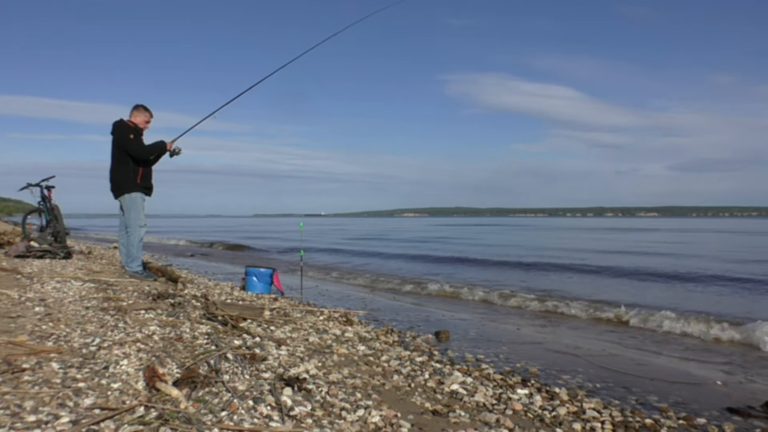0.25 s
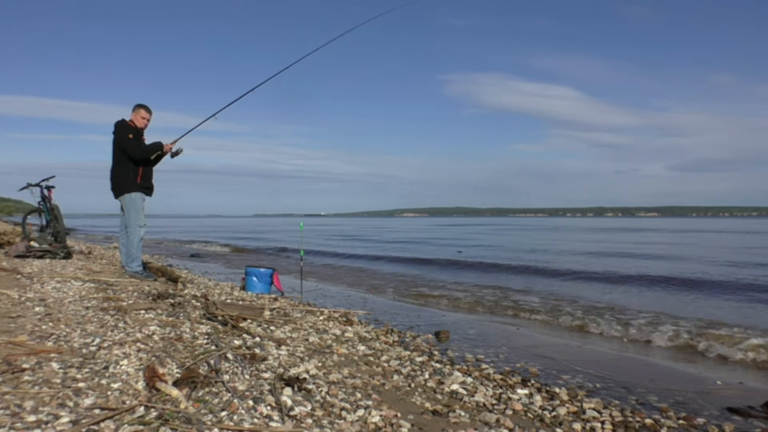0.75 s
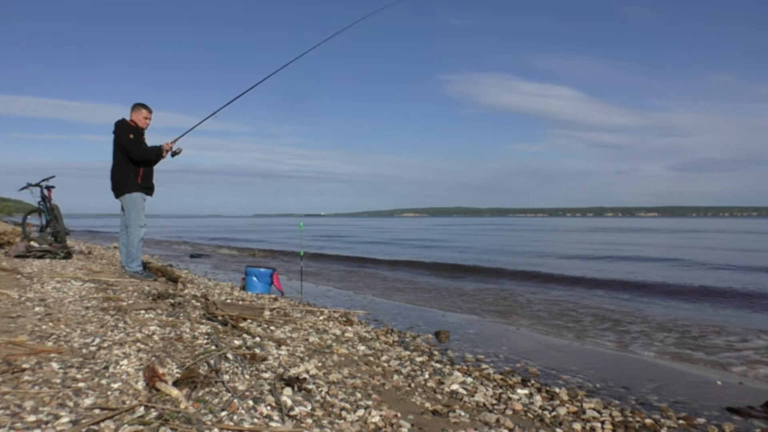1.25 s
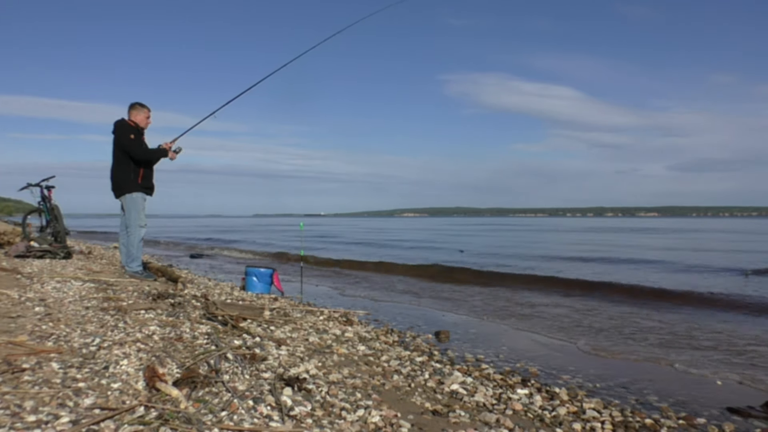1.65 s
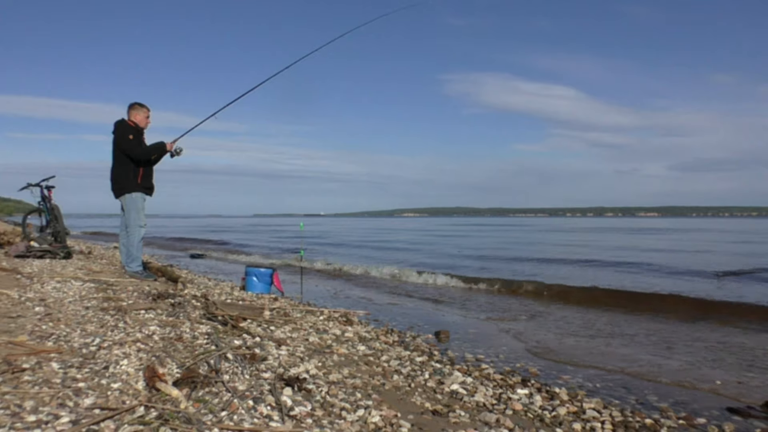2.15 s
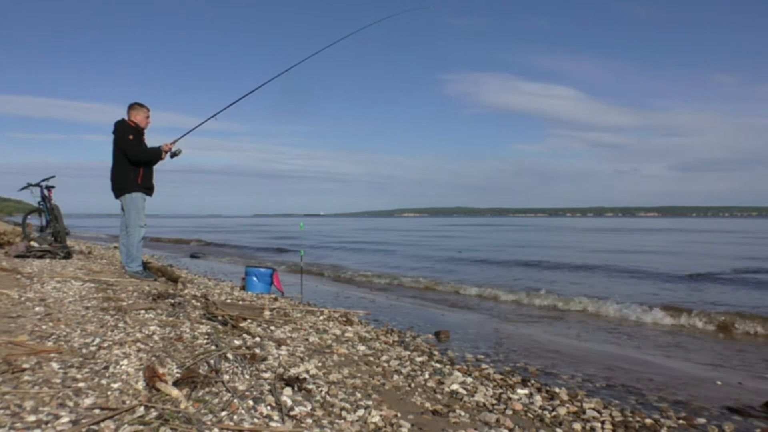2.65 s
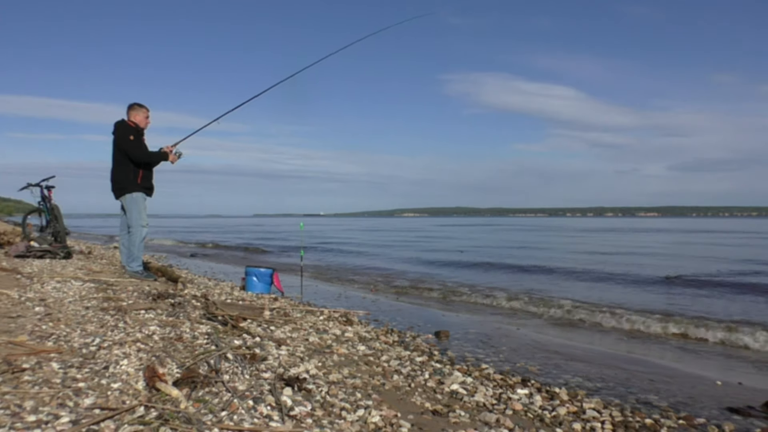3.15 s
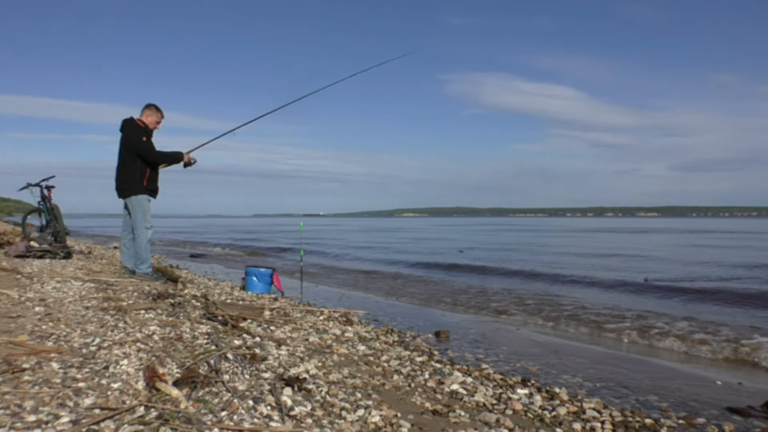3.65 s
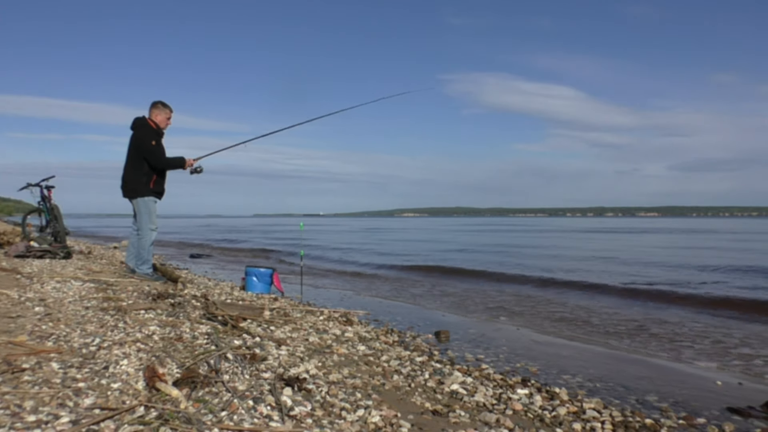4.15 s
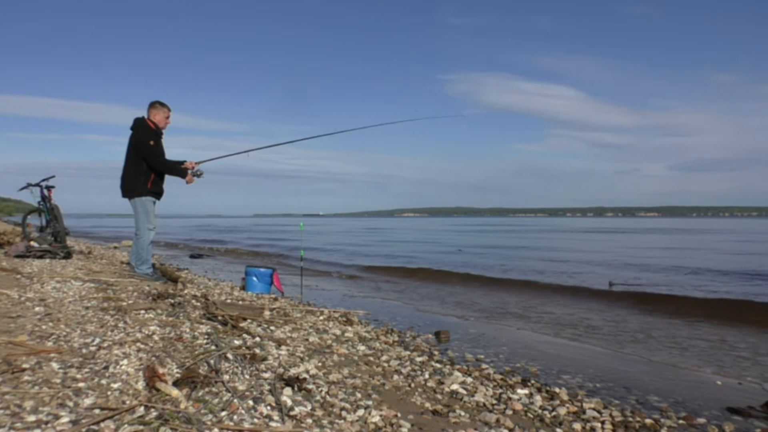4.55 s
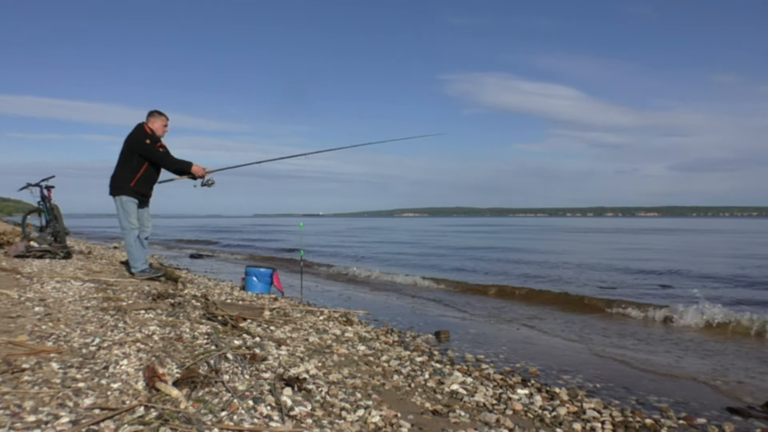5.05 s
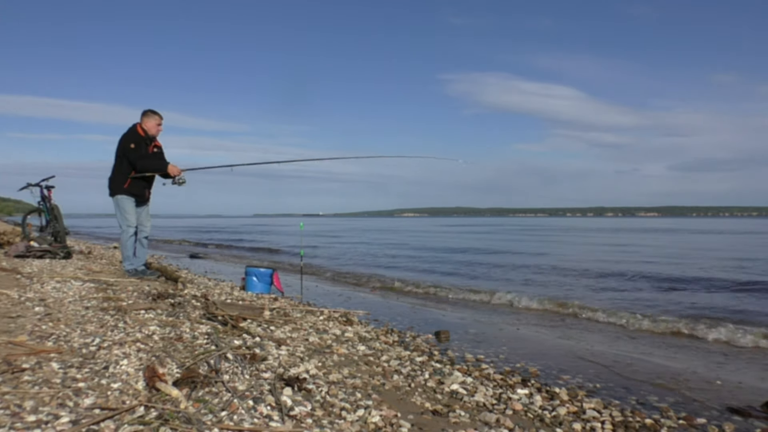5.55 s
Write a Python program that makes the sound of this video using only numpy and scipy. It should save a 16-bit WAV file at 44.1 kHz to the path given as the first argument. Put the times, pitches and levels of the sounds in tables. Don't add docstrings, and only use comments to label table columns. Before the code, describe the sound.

Close stereo wash of little waves on shingle: constant watery hiss, plopping bubbles, tiny pebble ticks and a quieter lull before the last break.

```python
import sys
import numpy as np
from scipy import signal
from scipy.io import wavfile

SR = 44100
rng = np.random.default_rng(int(sys.argv[2]) if len(sys.argv) > 2 else 0)


def store_wav(level_fs):
    pcm = np.round(np.clip(np.atleast_2d(level_fs), -1, 1) * 32767)
    wavfile.write(sys.argv[1], SR, pcm.T.astype(np.int16))


def natural_amplitude(level_db):
    exponent = np.asarray(level_db, float) / 20
    return 10 ** exponent


N = 255325

# (f/Hz, left port's lag/rad for a source on the right, left minus right/dB, scattered share 0-1)
PORTS = [(100, .01, 0, .0002), (450, .07, 0, .004), (1000, .27, -.3, .012), (2000, .4, -1.6, .025),
         (3000, .55, 0, .035), (4100, .85, .3, .06), (5200, 1.15, 2.2, .07), (6200, 1.8, 3, .08),
         (7200, 2.35, 1.5, .08), (8300, 2.7, -2.2, .08), (10500, 2.9, -3.5, .1), (15000, 3.0, -1, .1)]
# (t/s, level of the close one on the right over the far one ahead/dB)
RIGHT = [(0.0, -1), (0.45, 4.5), (0.75, 8), (1.0, 17), (1.7, 20.5), (1.9, 2.5), (2.2, -2.5), (2.62, -4),
         (2.74, 3.5), (3.2, 8), (3.62, 10), (3.72, 19.5), (4.65, 15.5), (4.8, 3.5), (5.0, -0.5), (5.3, 0),
         (5.79, 2.5)]
# (f/Hz, close stretch against the far one/dB, lift of the close one/dB)
HOUSING = [(1000, -5.5, 0), (4000, -4.5, 0), (5300, 2.5, 0), (7500, 0, 2.5), (9080, -1.5, 2),
           (10500, -2.5, 0), (12000, -3, 0), (14500, -0.5, 0)]


def in_time(rows):
    s, *columns = np.transpose(rows)
    return [np.interp(np.arange(N) / SR, s, c) for c in columns]


def at_hz(points, hz):
    f, *columns = np.transpose(points)
    return [np.interp(np.log(hz), np.log(f), c) for c in columns]


def drift(rate):
    every = 40
    r = np.exp(-80 * np.pi * rate / SR)
    noise = rng.standard_normal(N // every + 2002)
    slow = signal.lfilter([1], [1, -2 * r, r * r], noise)[2000:]
    return np.interp(np.arange(N) / every, np.arange(len(slow)), slow / slow.std())


def swells(events, width_s):
    t = np.arange(0, N / SR + .002, .001)
    lift_db = sum(db * np.exp(-.5 * ((t - s) / width_s) ** 2) for s, db in events)
    return np.interp(np.arange(N) / SR, t, lift_db)


def ports(wave, hz, bearing):
    lag, lean_db, _ = at_hz(PORTS, hz)
    half = np.exp(.5j * lag * bearing) * natural_amplitude(-.5 * lean_db * bearing)
    return np.array([(wave / half).real, (wave * half).real])


def right_share(right_db, hz):
    return 1 / (1 + natural_amplitude(-2 * (right_db + at_hz(HOUSING, hz)[0])))


def beach(near, around, hz, right_db):
    share = right_share(right_db, hz)
    scattered = min(0.82 * at_hz(PORTS, hz)[2], 1)
    far, other = np.roll(near, N // 3), np.roll(around, N // 2)
    close_part = np.sqrt(share) * natural_amplitude(at_hz(HOUSING, hz)[1]) * ports(near, hz, bearing=1)
    far_part = np.sqrt(1 - share) * ports(far, hz, bearing=0.1)
    scatter_part = np.array([around.real, other.real])
    return np.sqrt(1 - scattered) * (close_part + far_part) + np.sqrt(scattered) * scatter_part


def ring(kicks, hz, cycles):
    pole = np.exp((2j * np.pi - np.log(1000) / cycles) * hz / SR)
    out = signal.lfilter([1], np.poly([pole] * 3), kicks + 1e-18)
    return out / np.sqrt(np.mean(out.real ** 2, axis=-1, keepdims=True))


def collapses():
    # (t/s, lift/dB)
    crests = [
        (0.875, 1),
        (1.002, 2.5),
        (2.74, -0.5),
        (3.385, 3),
        (4.78, -0.5),
        (4.895, 6.5),
    ]
    t = np.arange(N) / SR
    fade_s = 0.063
    return sum(db * (t > s) * np.exp(-np.maximum(t - s, 0) / fade_s) for s, db in crests)


def clumps(hz):
    # (t/s, lift/dB, centre f/Hz)
    groups = [(0.125, 5.5, 664), (0.244, 4, 660), (0.454, 3.5, 380), (0.459, 5, 865), (0.579, 5, 663),
              (0.733, 0.5, 430), (0.828, 7, 2590), (0.968, 12.5, 381), (1.073, 6, 3350), (1.397, 2, 660),
              (1.437, 2, 295), (1.541, 4.5, 3960), (1.541, 5.5, 650), (2.01, 6.5, 1140), (2.08, 4.5, 660),
              (2.215, 5.5, 870), (2.23, 7, 430), (2.434, 4, 1000), (2.779, 6, 1500), (2.893, 3.5, 2620),
              (2.978, 5, 570), (3.053, 3, 380), (3.133, 1, 2620), (3.317, 2, 380), (3.412, 4, 1140),
              (3.417, 7, 2280), (3.542, 3.5, 574), (3.692, 6, 495), (3.712, 2, 2940), (3.811, 3, 2900),
              (3.921, 6, 651), (4.046, 0, 500), (4.32, 1, 380), (4.505, 4.5, 503.5), (4.644, 5.5, 497),
              (4.899, 5, 325), (5.128, 6, 380), (5.193, 5, 500), (5.208, 3.5, 3960), (5.373, 5, 380),
              (5.607, 10, 380), (3.02, 3.5, 2980), (3.08, 3, 2780), (3.17, 1.5, 2600), (3.31, 1, 2500),
              (3.36, 4, 2900), (3.45, 0, 2900), (1.49, 4, 1000), (0.73, -1, 800), (0.3, 1, 2800),
              (0.7, 3.5, 2600), (5.4, -3.5, 1100), (5.48, -3, 1050), (5.55, -4, 1150), (1.3, 4, 560),
              (3.5, -4, 4300), (1.63, -1, 400), (1.74, 0, 800)]
    octaves = 0.17
    lifts = []
    for s, db, centre_hz in groups:
        distance = np.log2(hz / centre_hz) / octaves
        lifts.append((s, db * np.exp(-.5 * distance ** 2)))
    return swells(lifts, width_s=0.028)


def foam(cycles, births_per_cycle, size_db, hiss_db, patchy_db, surge_db):
    # (t/s, wash level/dB, big bubbles over the wash/dB, spray over the wash/dB)
    surf = [(0.0, -25.5, -0.5, 1), (0.78, -25, 1, 2.5), (1.05, -23, -0.5, 2), (1.47, -23.5, 0.5, -2),
            (1.66, -30, 1, 2), (1.88, -31.5, -2.5, 1.5), (2.15, -29.5, 2.5, 2), (2.62, -27, -1, 0),
            (2.72, -26.5, -0.5, 5), (3.1, -23, -0.5, -2), (3.58, -24.5, -1, 2), (3.8, -22.5, -0.5, -1.5),
            (4.3, -32.5, -2.5, 1), (4.76, -39, -2.5, 3), (4.92, -33, -3.5, 3.5), (5.27, -26, -1.5, 1),
            (5.66, -28, -6, -1), (5.79, -29.5, -8.5, 0.5)]
    # (f/Hz, level/dB per Hz)
    colour_curve = [(60, -34.5), (90, -52), (130, -21.5), (200, -14.5), (300, -7), (480, -0.5), (650, -1.5),
                    (950, -3.5), (1500, -4.5), (2300, -6), (3200, -7), (4500, -11), (6000, -18),
                    (8000, -24), (10500, -28), (12500, -32.5), (14500, -56)]
    size_hz = [450, 1600, 3800, 8500]
    # (t/s, lift of the small
    # bubbles/dB)
    splashes = [(0.262, 1.5), (0.437, 1), (0.524, 2.5), (0.885, 2.5), (1.042, 0), (1.111, 0.5), (1.383, 0),
                (2.148, 1.5), (2.744, 4), (3.073, 2), (3.133, -1), (3.358, 2), (3.395, 0), (3.412, 1),
                (3.432, 3.5), (3.452, 2), (4.276, 3), (4.517, 3.5), (4.795, 3.5), (4.84, 3), (4.925, 3.5),
                (4.95, 4), (5.277, 1), (5.5, 3.5)]
    # (t/s, lift/dB)
    tumbles = [(0.24, 0.5), (0.5, -1), (0.66, 1), (0.76, 0), (0.88, -0.5), (1.05, -0.5), (1.15, 1.5),
               (1.4, 2.5), (1.56, 1), (1.8, 0.5), (1.96, 1), (2.75, 0), (3.04, 1.5), (3.13, 3), (3.33, 1),
               (3.42, -3.5), (3.76, 1), (4.43, -1), (4.93, -3.5), (5.28, 0.5), (5.5, 0.5), (5.64, 1)]
    splash_hz, tumble_hz = 2210, 700

    wash_db, big_db, spray_db = in_time(surf)
    (right_db,) = in_time(RIGHT)
    thrown_db = 1.06 * swells(splashes, width_s=0.0072)
    tumble_db = swells(tumbles, width_s=0.025)
    small_db = 0.67 * spray_db - 0.16 * wash_db
    colour = np.array([big_db - big_db.mean(), 0 * big_db,
                       small_db - small_db.mean(), spray_db - spray_db.mean()])
    surge, neighbours, out = drift(26), .5 * drift(9), 0
    right_db = right_db + 2.5 * np.roll(surge, N // 2)

    for hz in np.geomspace(70, 15000, 25):
        born = rng.random(N) < births_per_cycle * hz / SR
        sizes = natural_amplitude(size_db * np.minimum(rng.exponential(1, N), 5))
        kicks = born * sizes * rng.choice([-1, 1], N)
        hiss, scattered = rng.standard_normal((2, N))
        bubbles_and_hiss = kicks / kicks.std() + natural_amplitude(hiss_db) * hiss
        near, around = ring(np.array([bubbles_and_hiss, scattered]), hz, cycles)

        neighbours = 0.74 * neighbours + 0.25 * drift(9)
        weights = [np.interp(np.log(hz), np.log(size_hz), row) for row in np.eye(4)]
        level_db = at_hz(colour_curve, hz)[0] + 10 * np.log10(hz / 1000) + weights @ colour
        level_db += clumps(hz)
        level_db += thrown_db / (1 + (splash_hz / hz) ** 4)
        level_db += tumble_db / (1 + (tumble_hz / hz) ** 2)
        level_db += patchy_db * neighbours + surge_db * surge
        out = out + natural_amplitude(level_db) * beach(near, around, hz, right_db)
    return natural_amplitude(wash_db + collapses() - 4.0) * out


def single_bubble(hz, cycles, rise, turn):
    turns = np.arange(int(4 * cycles * SR / hz)) * hz / SR
    life = turns / cycles
    swell = life ** 2 * np.exp(2 - 2 * life)
    wave = swell * np.exp(2j * np.pi * (turn + turns * (1 + rise * (life / 2 - 1))))
    knots = np.arange(int(turns[-1]) + 2)
    shake = rng.standard_normal((2, 40))[:, :len(knots)]
    wobble = np.interp(turns, knots, shake[0]) + 1j * np.interp(turns, knots, shake[1])
    return wave * (1 + 0.35 * (hz < 900) * wobble)


def lone_bubbles(rise, trim_db):
    # (t/s, peak level/dB, f/Hz, cycles to the peak)
    gulps = [(0.074, -15, 408, 1.8), (0.093, -11, 670, 1.9), (0.108, -20, 424, 2.4), (0.449, -13, 545, 5.9),
             (0.684, -13, 598, 3.4), (1.157, -9, 650, 3.6), (1.188, -11, 520, 2.3), (1.259, -5.5, 530, 1.1),
             (1.386, -14, 425, 4.4), (1.443, -3.5, 487, 1.35), (1.48, -9.5, 700, 3.2),
             (2.012, -20, 610, 3.5), (2.045, -14.5, 466, 2.6), (2.255, -18, 725, 3.4),
             (2.398, -13, 590, 1.5), (2.428, -12, 733, 1.66), (2.472, -11, 615, 2),
             (2.741, -13.5, 733, 3.3), (3.045, -7, 605, 1.4), (3.132, -11.5, 592, 3.4),
             (3.249, -18.5, 337, 1.8), (4.051, -18, 490, 2.1), (4.174, -18, 700, 1.4),
             (4.295, -22, 414, 1.6), (4.895, -17, 480, 1), (5.08, -21, 528, 3.3), (5.129, -19, 516, 6),
             (5.309, -21, 349, 5.7), (5.345, -21.5, 384, 3.3), (5.395, -18.5, 630, 3.2)]
    # (t/s, peak level/dB, f/Hz)
    drops = [(1.013, -11, 2060), (1.037, -13, 3040), (1.792, -15, 1040), (2.38, -15, 970),
             (2.748, -9, 1740), (2.829, -11, 1250), (3.003, -10.5, 1010), (3.392, -6, 2610),
             (4.412, -23, 1140), (4.434, -19, 2120), (4.783, -18.5, 2680), (4.947, -13, 2140),
             (5.216, -14, 1490), (5.271, -10, 3600), (5.287, -15, 1160), (5.647, -15, 1020)]
    # (t/s, peak level/dB, f/Hz)
    slaps = [
        (0.0, -35, 91.7),
        (0.073, -36.5, 134),
        (0.451, -37, 133),
        (0.62, -36, 95),
        (0.92, -34, 86),
        (2.741, -36, 103),
        (3.013, -33, 162),
        (4.8, -40, 195),
        (4.894, -52, 135),
    ]
    # (t/s, peak level/dB, f/Hz)
    ticks = [(0.241, -10.5, 894), (0.293, -17, 1150), (0.526, -19, 1150), (0.655, -5.5, 1170),
             (0.76, -8, 795), (0.806, -5, 2610), (0.819, -13, 870), (0.88, -15, 1590), (1.005, -11, 1770),
             (1.052, -5, 1070), (1.076, -3, 1950), (1.109, -2, 1490), (1.383, -8, 2210), (2.744, -2, 2270),
             (2.899, -13, 3560), (3.064, -9, 2430), (3.094, -18, 802), (3.328, -9, 2770),
             (3.386, -19, 1210), (3.426, -6.5, 855), (3.731, -12, 2830), (4.102, -16, 1290),
             (4.275, -20, 1490), (4.507, -27, 1290), (4.512, -19, 2720), (4.628, -21, 2840),
             (4.784, -16, 2770), (4.793, -24, 3280), (4.816, -22, 1760), (4.898, -16, 3250),
             (5.004, -19, 1220), (5.279, -20, 1230), (5.492, -12, 2300), (5.718, -14, 2220)]
    # (t/s, peak level/dB, f/Hz)
    more_gulps = [(0.19, -20, 283), (0.424, -22, 357), (0.457, -12, 770), (1.437, -21, 292), (2.279, -23, 356),
                  (3.041, -31, 288), (3.31, -21, 358), (3.423, -14, 565), (4.547, -35, 284),
                  (4.576, -30.5, 705), (4.679, -28, 900), (4.929, -25, 626), (5.63, -32, 287),
                  (3.855, -19, 1500), (1.17, -15, 560), (5.14, -26, 525), (2.45, -22, 593), (3.7, -19, 527)]

    singles = list(gulps)
    for events, cycles in [(drops, 3.2), (slaps, 2.8), (ticks, 0.73), (more_gulps, 2.76)]:
        singles += [(*row, cycles) for row in events]

    out = np.zeros((2, N))
    (right_db,) = in_time(RIGHT)
    for (s, peak_db, hz, cycles), turn in zip(singles, rng.random(len(singles))):
        wave = single_bubble(hz, cycles, rise, turn)
        i = round(s * SR)
        heard = natural_amplitude(peak_db + trim_db) * ports(wave, hz, right_share(right_db[i], hz))
        out[:, i:i + len(wave)] += heard[:, :N - i]
    return out


def scene():
    wash = foam(cycles=4.45, births_per_cycle=.25, size_db=3.0, hiss_db=2.0, patchy_db=1.0, surge_db=0.46)
    return wash + lone_bubbles(rise=0.038, trim_db=-4.5)


def low_pass(x):
    return signal.sosfilt(signal.butter(12, 15300, fs=SR, output="sos"), x)


def record(dry):
    bass_cut = signal.butter(2, 161, "high", fs=SR, output="sos")
    x = signal.sosfilt(bass_cut, dry)
    return low_pass(x)


dry = scene()
out = record(dry)
store_wav(out)
```